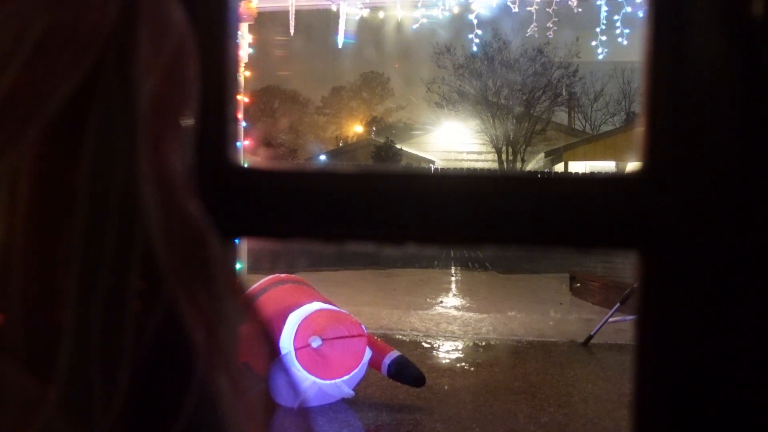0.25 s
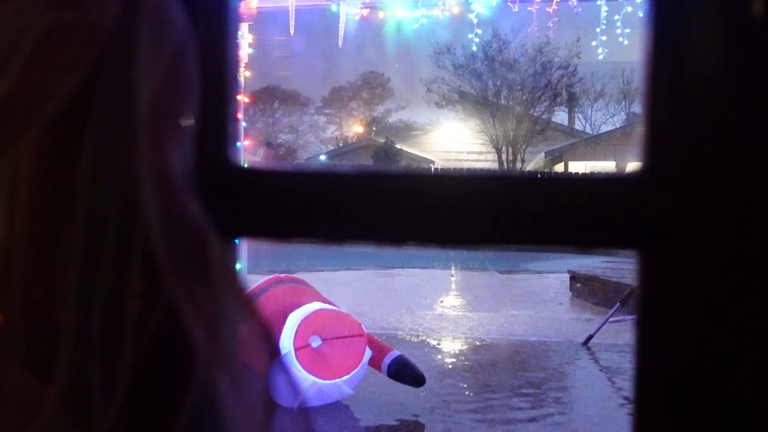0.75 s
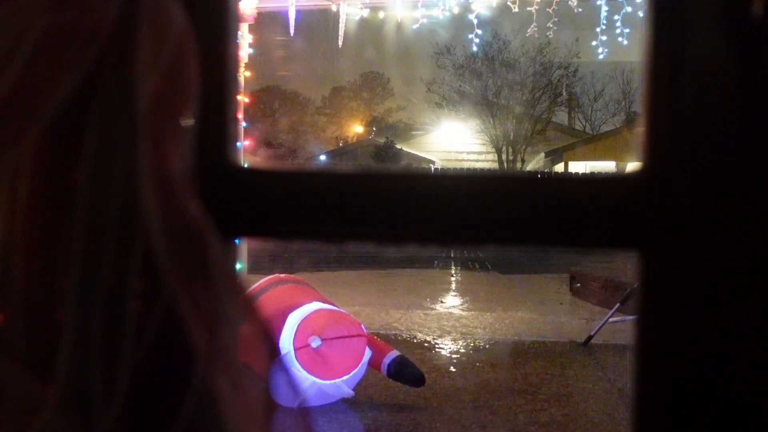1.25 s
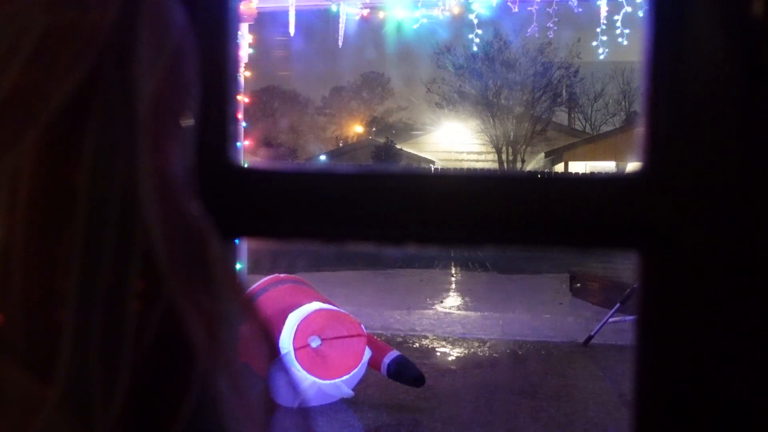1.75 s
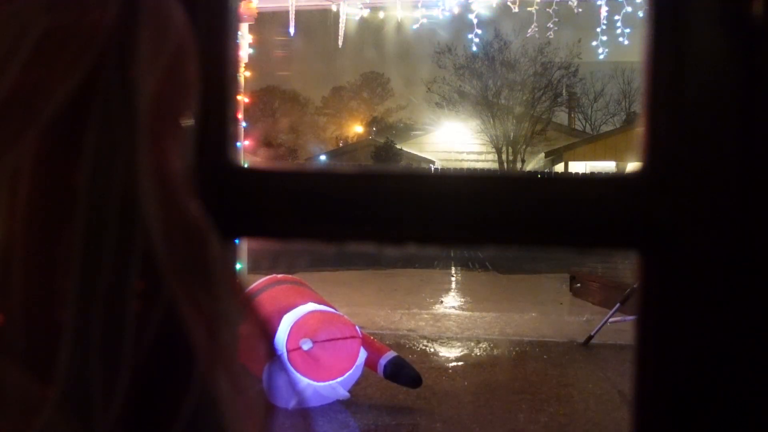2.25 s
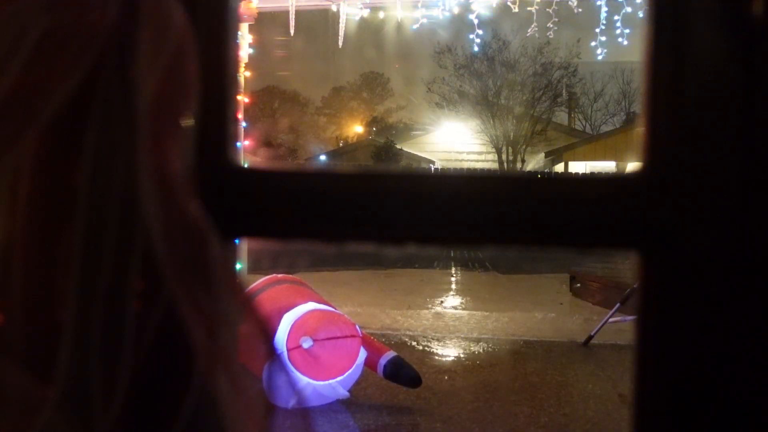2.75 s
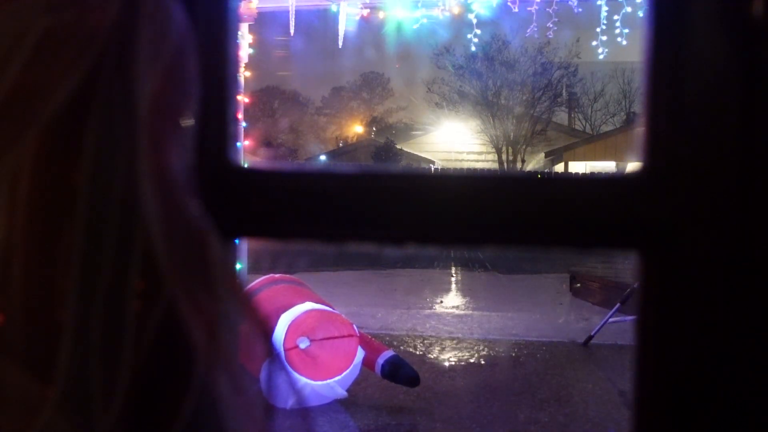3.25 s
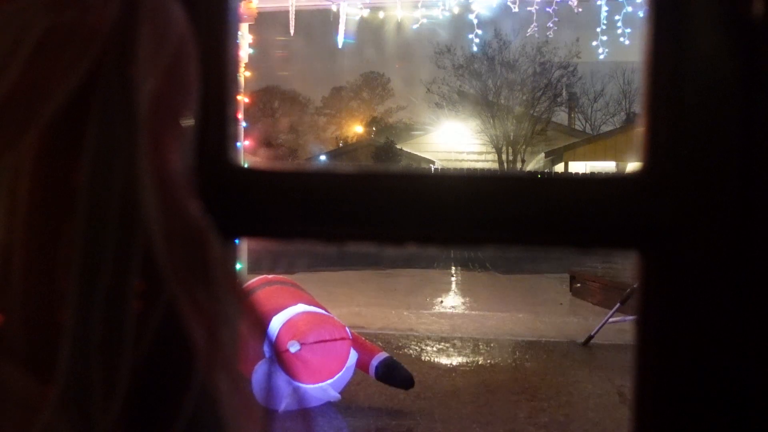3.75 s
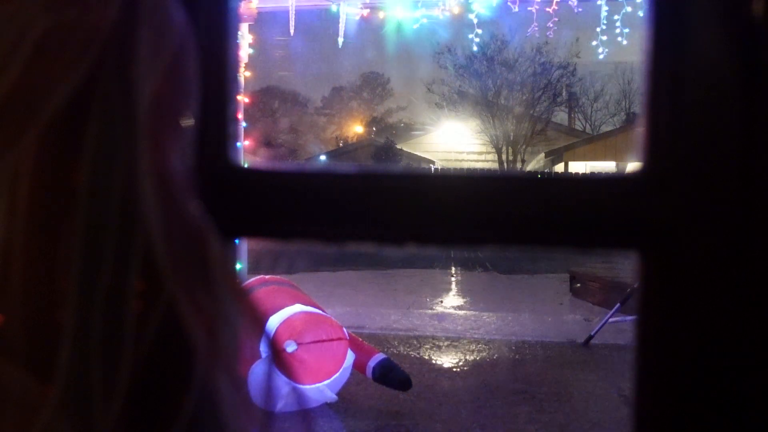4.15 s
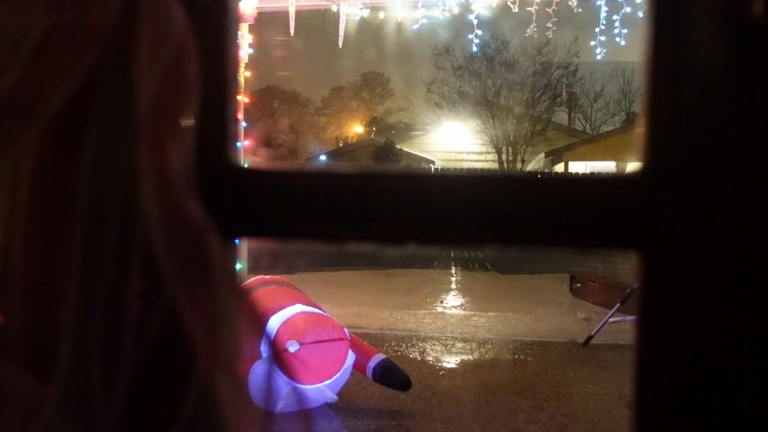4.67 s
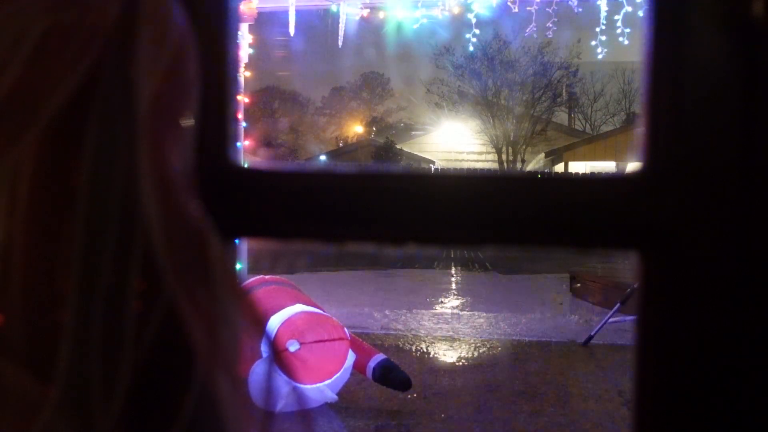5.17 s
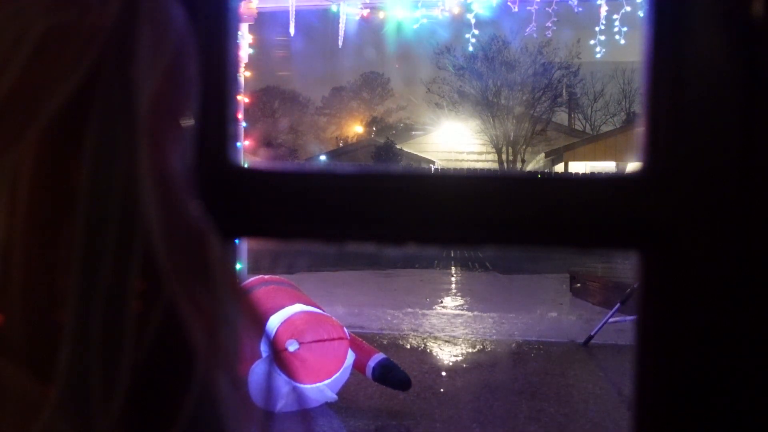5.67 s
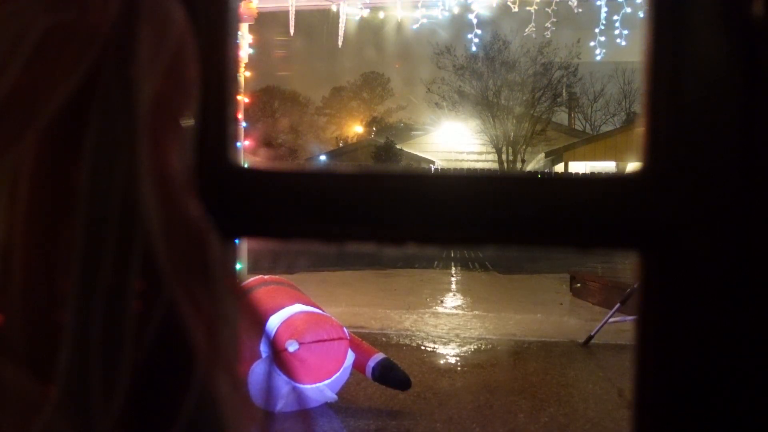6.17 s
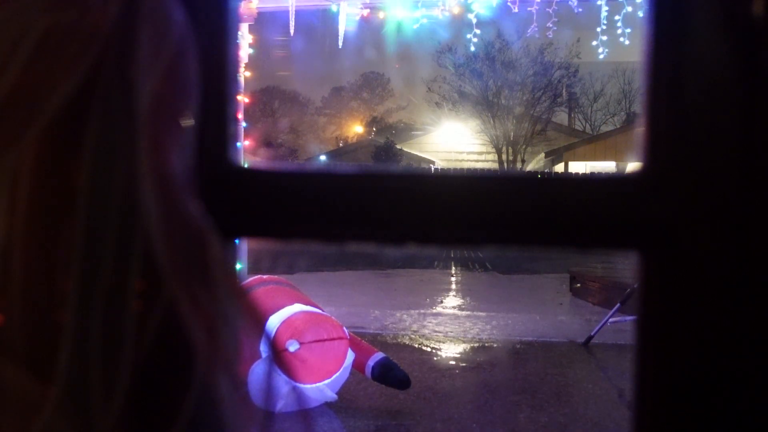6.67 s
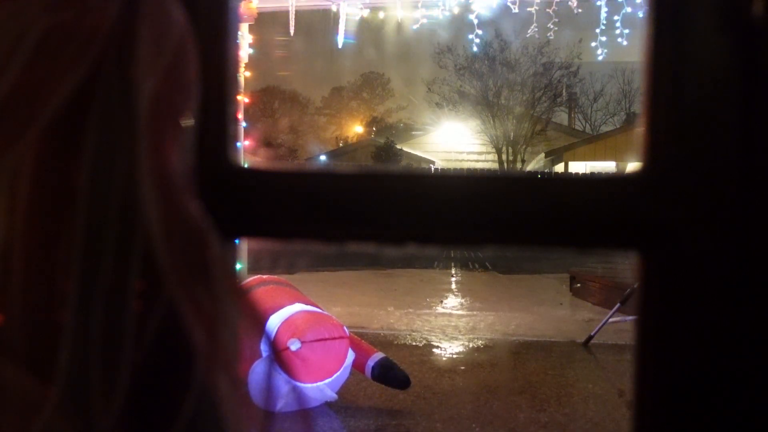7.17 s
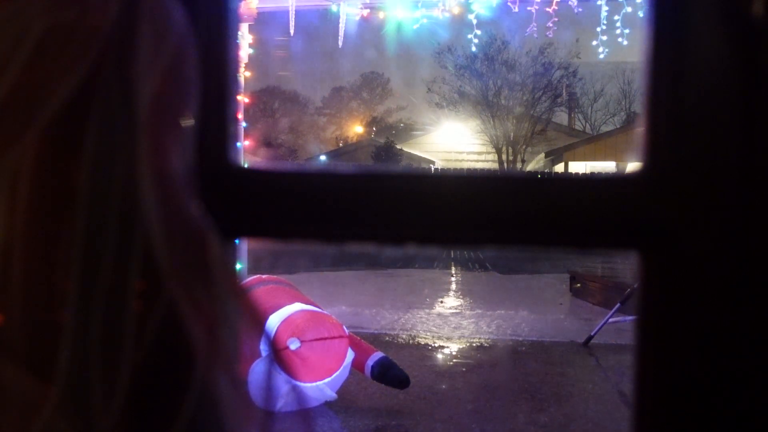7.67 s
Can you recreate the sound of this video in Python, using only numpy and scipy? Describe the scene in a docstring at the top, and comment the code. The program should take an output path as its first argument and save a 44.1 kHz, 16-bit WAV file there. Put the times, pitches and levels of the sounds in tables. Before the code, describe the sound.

Heavy rain falls continuously on wet pavement and puddles outside a closed glass door. The hiss is thin and bright, slightly ringing through the panes, with individual fat splashes and brief drip flurries. Rain drums dully on the roof, a faint fan hums low indoors, and distant thunder rolls softly around three seconds and again near six. Stereo microphones stand inside the room, facing the door.

```python
"""Heavy rain on pavement and puddles, heard from a room behind a glazed door: noise, random clicks and bubbles.
Fat splashes and flurries of drips stand out; the door holds back the lows and middle and rings at 1-5 kHz.
The shower builds, eases and drums on the roof, murmuring through the walls, while a small fan hums as a sine.
Further off, rain down the street is a soft wash of noise, and far thunder rolls twice as low, smeared clicks."""
import sys
import numpy as np
from scipy import signal
from scipy.fft import rfft, irfft
from scipy.io import wavfile

SR = 44100
rng = np.random.default_rng(int(sys.argv[2]) if len(sys.argv) > 2 else 0)


def store_pcm(level_fs):
    """Save levels as 16-bit WAV."""
    pcm = np.round(np.clip(level_fs, -1, 1) * 32767).astype(np.int16)
    wavfile.write(sys.argv[1], SR, np.atleast_2d(pcm).T)


N = 349272
TIME = np.arange(N) / SR  # s
FREQ = np.fft.rfftfreq(N, 1 / SR)  # Hz


def undb(db):
    """Decibels to gain."""
    return 10 ** (np.asarray(db) / 20)


def unit(x):
    """Scale to rms 1."""
    return x / np.sqrt(np.mean(x ** 2))


def curves(table):
    """Each column of a table as a line in time."""
    s, *columns = np.transpose(table)
    return [np.interp(TIME, s, column) for column in columns]


def contour(points):
    """Points joined on a log-frequency axis."""
    hz, value = np.transpose(points)
    return np.interp(np.log(FREQ + 1), np.log(hz + 1), value)


def colour(x, db):
    """Causal (minimum-phase) filter with the given gain per frequency, so that clicks ring after they strike."""
    cepstrum = irfft(np.log(undb(db)), N)
    cepstrum[1:N // 2] *= 2
    cepstrum[N // 2 + 1:] = 0
    response = np.exp(rfft(cepstrum))
    return irfft(rfft(x) * response, N)


def split(x, hz):
    """The parts below and above a frequency, which add up to the whole."""
    low = irfft(rfft(x) / (1 + (FREQ / hz) ** 6), N)
    return low, x - low


def walk(rate_hz):
    """Smooth random wavering with rms 1, made of noise slower than about the given rate."""
    slow = np.exp(-(FREQ / rate_hz) ** 2)
    return unit(irfft(rfft(rng.standard_normal(N)) * slow, N))


def add(track, s, sound):
    """Mix a sound into a track at a time."""
    start = int(s * SR)
    track[start:start + len(sound)] += sound[:N - start]


def impacts(per_s, spread_db):
    """Clicks of either sign at random moments: many small ones, a few big ones."""
    falls = rng.random(N) < per_s / SR
    sizes = undb(spread_db * np.minimum(rng.exponential(size=N), 4))
    return falls * sizes * rng.choice([-1, 1], N)


def scatter(x, t60, wet_db):
    """Every impact is followed by its own fading hiss of thrown droplets, t60 in seconds."""
    fade = np.exp(-2 * np.log(1000) * TIME[:SR // 4] / t60)
    energy = np.abs(signal.fftconvolve(x ** 2, fade / fade.sum())[:N])
    return x + undb(wet_db) * np.sqrt(energy) * rng.standard_normal(N)


def bubbles(per_s, low_hz, high_hz, cycles, glide):
    """Drops in puddles trap air bubbles, which ring for a few cycles and rise in pitch."""
    out, t = np.zeros(N), TIME[:SR // 20]
    for when, pitch, size in rng.random((int(per_s * N / SR), 3)):
        hz = low_hz * (high_hz / low_hz) ** pitch
        age = t * hz / cycles  # 1 when the ring has died to 1/e
        ring = np.exp(-age) * np.sin(2 * np.pi * hz * t * (1 + glide * age))
        add(out, when * N / SR, size ** 3 * ring)  # the cube makes big bubbles rare
    return unit(out)


def downpour():
    """Distant drops merge into hiss; nearer ones click, runoff slaps and sprays, puddles bubble."""
    hiss = rng.standard_normal(N)
    drops = unit(scatter(impacts(per_s=1300, spread_db=2.0), t60=0.02, wet_db=0))
    slaps, mist = split(scatter(impacts(per_s=110, spread_db=2.0), t60=0.042, wet_db=7), hz=4550)
    runoff = unit(slaps + undb(-3) * mist)
    puddles = bubbles(per_s=330, low_hz=1418, high_hz=8880, cycles=8.7, glide=0.024)
    return undb(-2.5) * hiss + undb(-5.5) * drops + undb(-11.5) * runoff + undb(-18.0) * puddles


def door(x):
    """The glass holds back the lows and middle, passes the low treble and rings at its resonances."""
    # what the door lets in: (frequency [Hz], relative gain [dB])
    passage = [(300, -38.5), (600, -23.5), (1000, -19), (1400, -11), (1900, -5.5), (2300, -2), (3000, -2),
               (3600, -4), (5200, -2), (7000, -8.5), (9000, -10), (12000, -19), (16000, -24.5)]
    # resonances of panes and frame: (centre [Hz], width [Hz], lift [dB])
    panes = [(1354, 50, 5.5), (1660, 15, 1.5), (1822, 76, 2.5), (2162, 34, 5.5), (2250, 49, 4.5),
             (2430, 54, 6), (2710, 54, 5.5), (3170, 61, 2), (3325, 38, 5.5), (4270, 95, 3), (4440, 130, -1),
             (4550, 220, 1), (5220, 160, -1.5)]
    ringing = sum(db / (1 + (2 * (FREQ - hz) / width) ** 2) for hz, width, db in panes)
    return colour(x, contour(passage) + ringing)


def rain(shower_db):
    """Rain comes in sheets and clumps; bigger drops sound lower and follow the shower's strength more."""
    # heavy, light and fine drops: (level before wavering [dB], follow [dB per dB of shower],
    # random sheets [dB rms], quick clumps [dB rms])
    drop_sizes = [(-46.5, 0.55, 0.3, 0.96), (-47, 0.4, 0.27, 0.67), (-49, .05, 0.1, 0.9)]
    sheets_hz, clumps_hz = 5, 13  # how fast the rain wavers
    heavy, rest = split(door(downpour()), hz=2860)
    light, fine = split(rest, hz=6220)
    sheets = walk(sheets_hz)  # shared by all sizes
    out = np.zeros(N)
    for drops, (db, follow, sheets_db, clumps_db) in zip((heavy, light, fine), drop_sizes):
        level_db = db + follow * shower_db + sheets_db * sheets + clumps_db * walk(clumps_hz)
        out += unit(drops) * undb(level_db)
    return out


def house(shower_db):
    """Rain drums dully on the roof and murmurs through the walls; a small fan hums and wavers."""
    # slow wavering indoors: (time [s], wall murmur level [dB], fan hum level [dB])
    indoors = [(0, -52.5, -52), (1, -51.5, -54), (2, -54.5, -56), (3.3, -52, -53.5), (4.8, -52.5, -57),
               (6.1, -53, -53), (7, -56, -58.5), (7.92, -56, -57.5)]
    # dull drumming through the roof: (frequency [Hz], relative gain [dB])
    roof_colour = [(90, -29.5), (140, -8), (185, -6.5), (230, 1.5), (295, -0.5), (345, -7.5), (405, -14.5),
                   (445, -12), (560, -27), (900, -45)]
    # low murmur through the walls: (frequency [Hz], relative gain [dB])
    wall_colour = [(20, -29), (35, -33), (45, -21), (60, -2), (68, -24), (84, 2), (120, 6), (150, 6),
                   (180, -5.5), (300, -36.5)]
    roof_db, roof_follow = -49.5, 1.27  # dB where the shower stands at 0 dB; dB gained per dB of shower
    hum_hz, hum_wander_hz = 154.9, 1.325  # middle pitch and its rms wander
    wall_db, hum_db = curves(indoors)
    roof = unit(colour(impacts(per_s=4000, spread_db=2), contour(roof_colour)))
    walls = unit(colour(rng.standard_normal(N), contour(wall_colour)))
    phase = 2 * np.pi * np.cumsum(hum_hz + hum_wander_hz * walk(4.8)) / SR
    hum = unit(np.sin(phase) * undb(2 * walk(17.0)))
    return roof * undb(roof_db + roof_follow * shower_db) + walls * undb(wall_db) + hum * undb(hum_db)


def street():
    """Rain further off merges into a soft wash of noise that swells and sinks."""
    # swell of the far rain: (time [s], level [dB])
    swell = [(0, -60), (.7, -54.5), (1.1, -58.5), (2.25, -58), (3.6, -62.5), (4.7, -58), (6, -61),
             (7.92, -61)]
    # colour of the far rain: (frequency [Hz], relative gain [dB])
    wash_colour = [(250, -24), (440, 0.5), (560, -2.5), (760, -5), (1000, -10), (1500, -23.5)]
    wash_db, = curves(swell)
    return unit(colour(rng.standard_normal(N), contour(wash_colour))) * undb(wash_db)


def tail(t60):
    """Noise that dies away by 60 dB in t60 seconds, with energy 1."""
    t = TIME[:SR // 2]
    decay = rng.standard_normal(len(t)) * np.exp(-np.log(1000) * t / t60)
    return decay / np.linalg.norm(decay)


def splashes(rebound_s, rebound_db, crown_t60, spray_t60, spray_db):
    """A fat drop slaps the ground, the fatter the harder, slaps again as its crown falls, and throws spray."""
    # fat splashes on the pavement: (time [s], relative level outside the door [dB], band low [Hz], band high [Hz])
    fat_drops = [(.075, -18.5, 8000, 11400), (.248, -26, 1500, 2600), (0.4712, -27, 1700, 3300),
                 (1.2715, -22, 2400, 7500), (1.4873, -22.5, 2000, 5500), (1.5434, -24.5, 1700, 3500),
                 (1.832, -24.5, 1600, 2440), (2.03, -24, 1800, 3400), (2.3192, -25, 1800, 3620),
                 (2.861, -24, 2000, 5500), (2.9305, -27, 2010, 2640), (3.074, -23.5, 1290, 2370),
                 (3.14, -24, 2000, 4800), (3.4835, -23, 3200, 5440), (3.656, -24.5, 3000, 9000),
                 (3.9733, -21, 1700, 4800), (4.061, -25, 3280, 6000), (4.1872, -24.5, 1800, 4000),
                 (4.682, -18, 1900, 4780), (4.951, -25, 2400, 7000), (5.006, -28, 2000, 3200),
                 (5.318, -21, 3000, 6000), (5.338, -24, 2080, 3100), (5.468, -26, 2000, 3000),
                 (5.67, -25.5, 1700, 4000), (5.7837, -24.5, 1900, 3500), (6.129, -25, 1900, 3500),
                 (6.336, -22, 3200, 6500), (6.4663, -26, 3000, 6000)]
    hard_db, softening = -18.5, .7  # level whose slap is not softened; dB of slap lost per dB below it
    out = np.zeros(N)
    for s, db, low_hz, top_hz in fat_drops:
        wet = signal.butter(3, [low_hz, top_hz], "bandpass", fs=SR, output="sos")
        parts = signal.sosfilt(wet, [signal.unit_impulse(SR // 2), tail(crown_t60), tail(spray_t60)])
        slap, crown, spray = undb(db) * parts / np.linalg.norm(parts, axis=1, keepdims=True)
        add(out, s, undb(softening * (db - hard_db)) * slap + undb(spray_db) * spray)
        add(out, s + rebound_s * rng.uniform(0.66, 1.2), undb(rebound_db) * crown)
    return out


def flurries(per_s, spread_db, width_octaves):
    """Now and then a handful of like-sized drips lands together, thickening and thinning again."""
    # flurries of close drips: (time at the thickest [s], length from there to 1/e^2 [s],
    # level at the thickest [dB], centre [Hz])
    handfuls = [(0.108, .04, -42.5, 3400), (.25, 0.4, -51, 9500), (0.726, 0.095, -44, 2400),
                (1.076, 0.11, -47.5, 2100), (2.36, .06, -45.5, 2400), (4.278, 0.14, -43.5, 2720),
                (4.895, 0.11, -49.5, 7200), (4.996, .05, -42.5, 2000), (5.427, 0.033, -43, 5240),
                (7.082, .06, -46, 7100), (7.143, .1, -44.5, 2830), (7.71, .07, -43.5, 3300)]
    drips = door(scatter(impacts(per_s, spread_db), t60=0.033, wet_db=-3.5))
    out = np.zeros(N)
    for s, length, db, hz in handfuls:
        band = np.exp(-(np.log2((FREQ + 1) / hz) / width_octaves) ** 2)
        like_sized = unit(irfft(rfft(drips) * band, N))
        out += like_sized * undb(db) * np.exp(-2 * ((TIME - s) / length) ** 2)
    return out


def thunder():
    """Cracks from a far lightning channel arrive smeared into low peals, which swell, fade and overlap."""
    # peals of far thunder: (time at the crest [s], level at the crest [dB], rise [s])
    peals = [(2.85, -49, .08), (3.17, -42.5, 0.11), (3.88, -48.5, .14), (4.4, -55, .15), (4.9, -55.5, .3),
             (6.03, -48.5, .12)]
    # colour of the thunder: (frequency [Hz], relative gain [dB])
    roll_colour = [(20, -32), (35, -18), (45, -11), (60, -11), (75, 5), (110, 2), (150, 1.5), (200, -3.5),
                   (260, -5.5), (340, -17.5), (500, -38.5)]
    fade_db_per_s = 11
    power = np.zeros(N)
    for s, db, rise in peals:
        swell = np.exp(-(np.minimum(TIME - s, 0) / rise) ** 2)
        fading_db = db - fade_db_per_s * np.maximum(TIME - s, 0)
        power += (swell * undb(fading_db)) ** 2
    cracks = impacts(per_s=900, spread_db=0)
    return unit(colour(cracks, contour(roll_colour))) * np.sqrt(power)


def scene():
    """Both microphones face the door; the room's diffuse field parts them a little."""
    # strength of the shower: (time [s], relative level [dB])
    shower = [(0, 0.2), (1.2, -0.1), (2.3, 1), (3.3, 1), (4.4, 0.9), (4.95, 1.5), (5.7, -1.4), (6.15, 0.4),
              (6.8, -1.5), (7.92, -2)]
    # likeness of the two microphones before the side trim: (frequency [Hz], coherence [0-1])
    alike = [(60, 1), (130, 0.94), (290, 0.8), (640, 0.34), (1410, 0.74), (3100, 0.98), (6820, 0.98),
             (15000, 0.97)]
    # balance of the two microphones: (frequency [Hz], left minus right [dB])
    balance = [(60, 1.5), (200, 0), (450, 0.5), (1200, -1.5), (2400, -1.95), (4400, -2.5), (8100, -3.5),
               (13000, -2)]
    shower_db, = curves(shower)
    fat = splashes(rebound_s=0.0044, rebound_db=-1, crown_t60=0.015, spray_t60=0.17, spray_db=2)
    spatter = undb(9.5) * door(fat)
    drips = flurries(per_s=1100, spread_db=2.5, width_octaves=0.64)
    front = rfft(rain(shower_db) + spatter + drips + house(shower_db) + street() + thunder())
    # random phases keep the colour but spread the sound evenly over time
    diffuse = front * np.exp(2j * np.pi * rng.random(len(front)))
    likeness = np.sqrt(np.clip(contour(alike), 0, .99))
    side = diffuse * np.sqrt((1 - likeness) / (1 + likeness)) * undb(-0.5)
    lean_db = contour(balance) / 2
    return np.array([irfft((front + sign * side) * undb(sign * lean_db), N) for sign in (1, -1)])


def record(dry):
    """The recorder cuts the top with a steep low-pass filter."""
    top_hz = 15650
    return signal.sosfilt(signal.ellip(10, .1, 80, top_hz, fs=SR, output="sos"), dry)


dry = scene()
out = record(dry)
store_pcm(out)
```